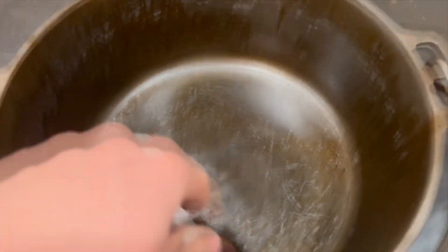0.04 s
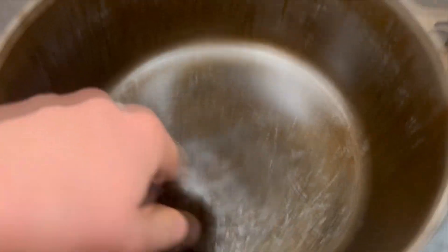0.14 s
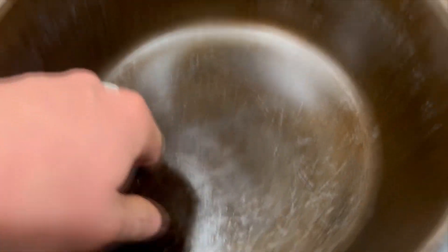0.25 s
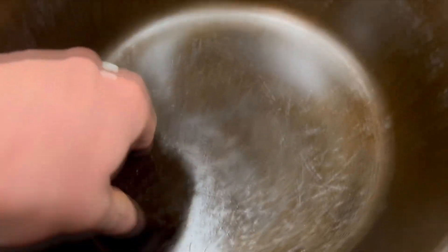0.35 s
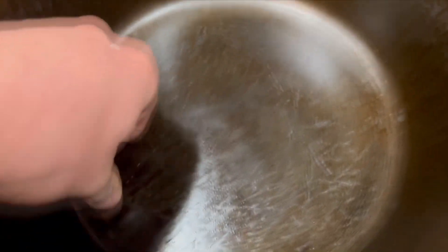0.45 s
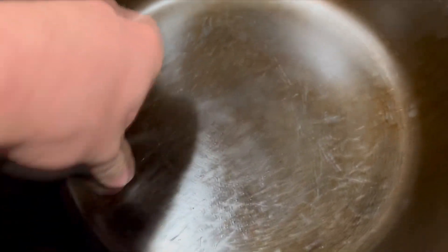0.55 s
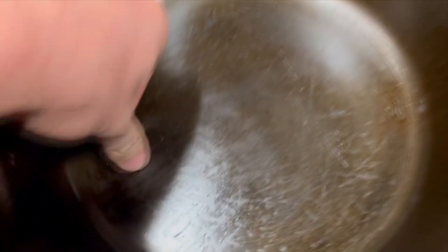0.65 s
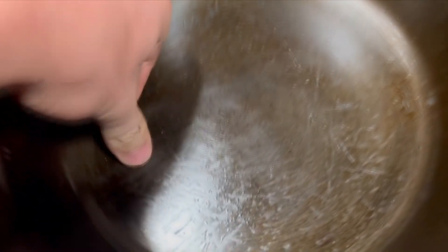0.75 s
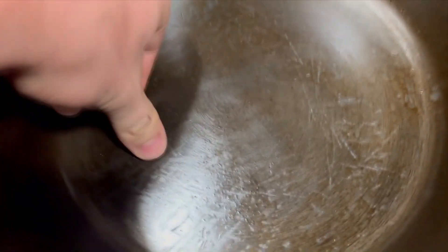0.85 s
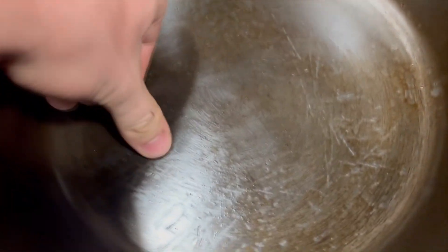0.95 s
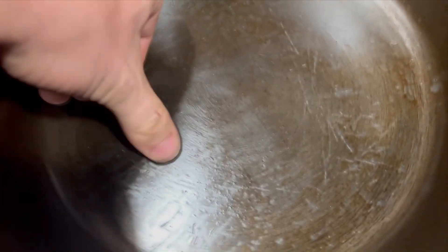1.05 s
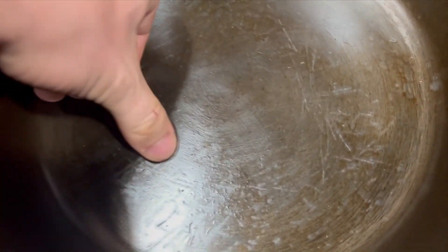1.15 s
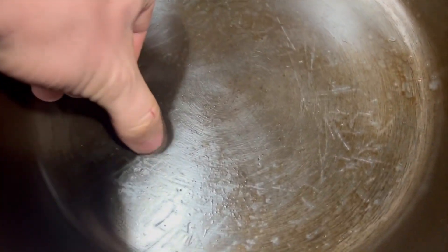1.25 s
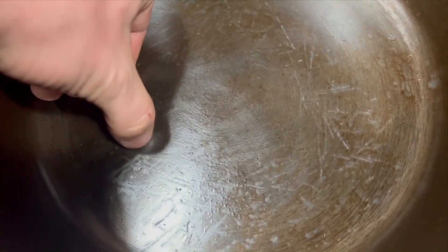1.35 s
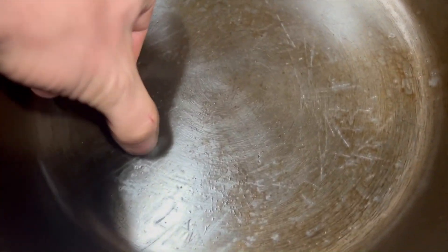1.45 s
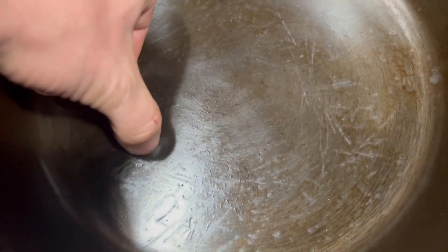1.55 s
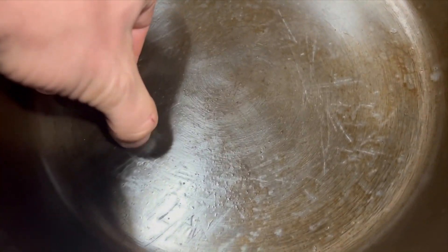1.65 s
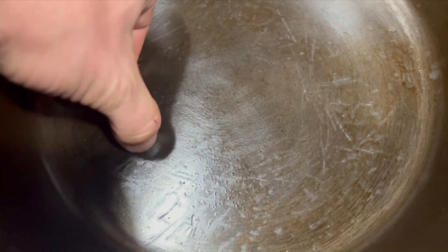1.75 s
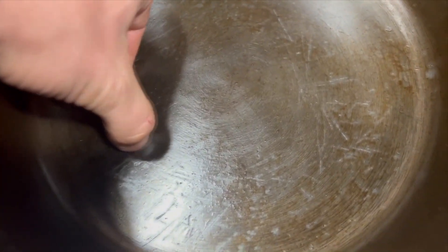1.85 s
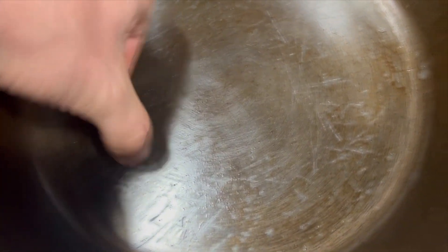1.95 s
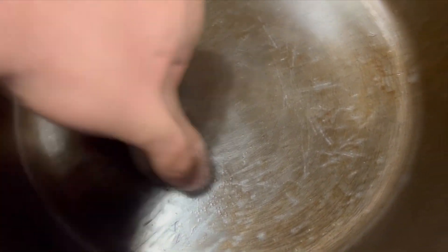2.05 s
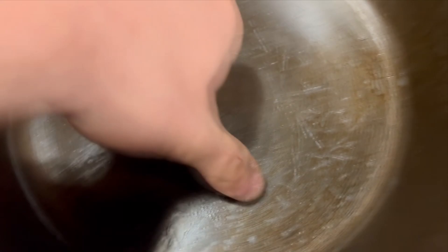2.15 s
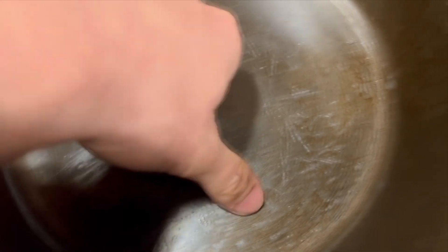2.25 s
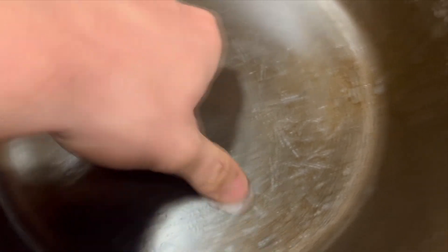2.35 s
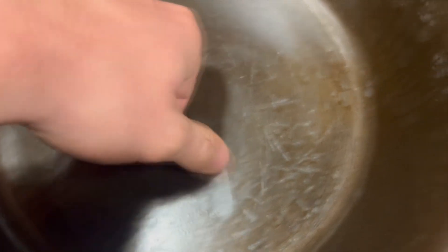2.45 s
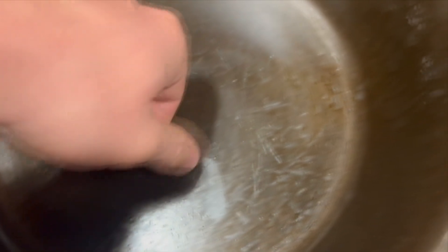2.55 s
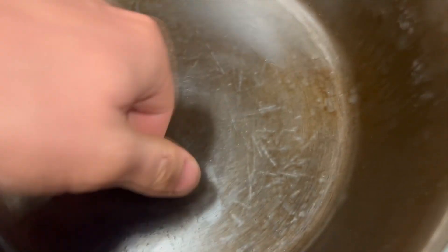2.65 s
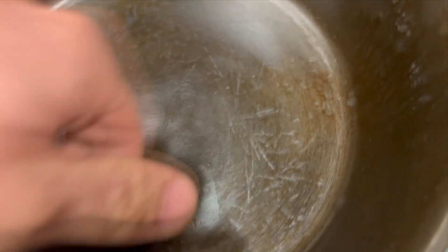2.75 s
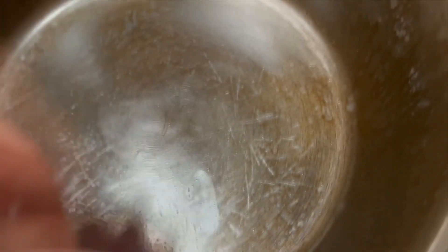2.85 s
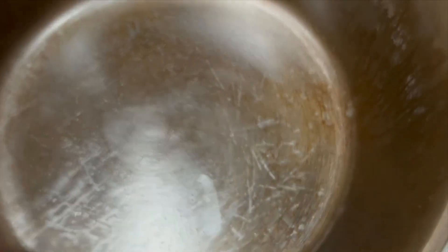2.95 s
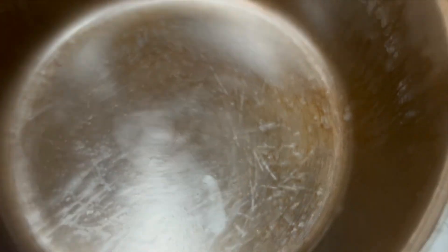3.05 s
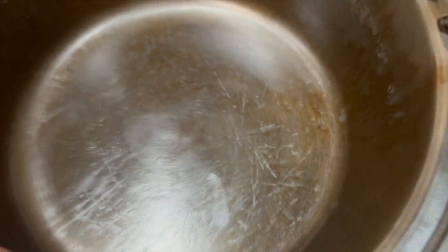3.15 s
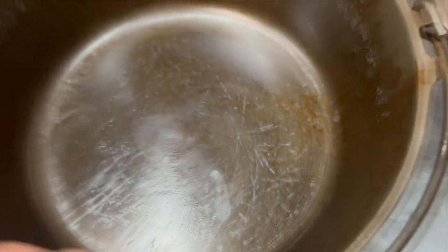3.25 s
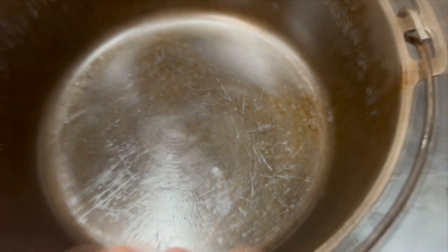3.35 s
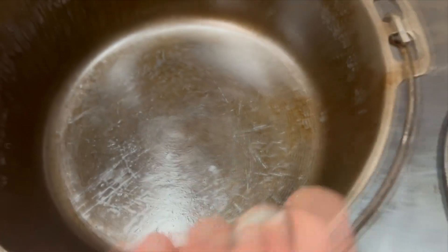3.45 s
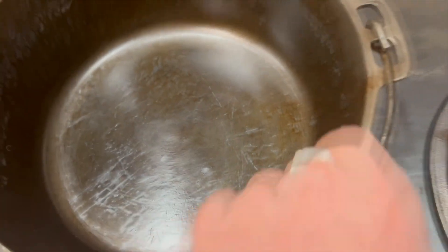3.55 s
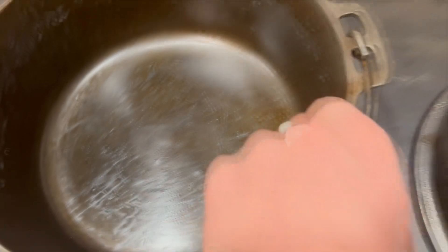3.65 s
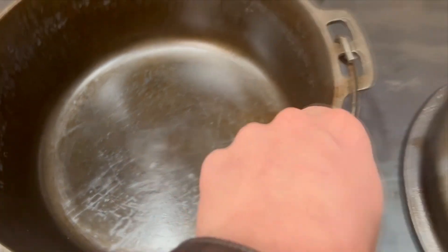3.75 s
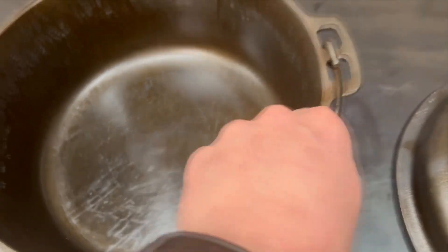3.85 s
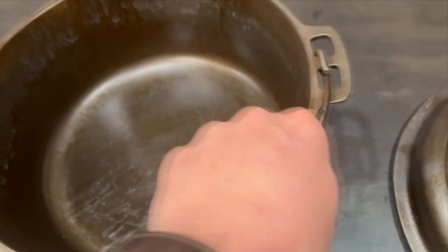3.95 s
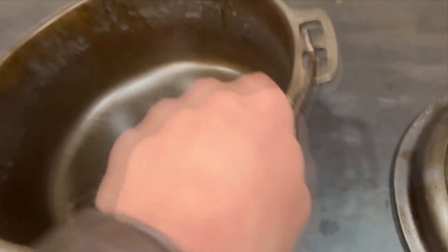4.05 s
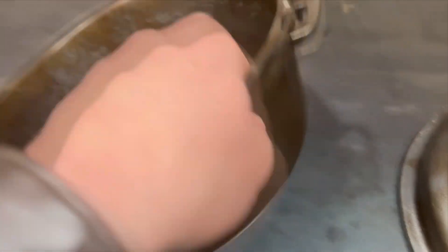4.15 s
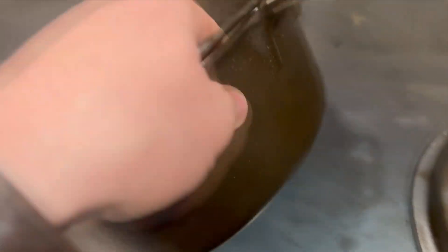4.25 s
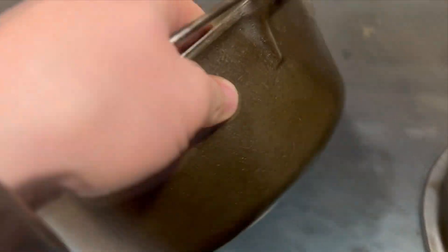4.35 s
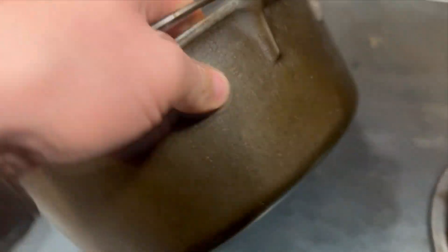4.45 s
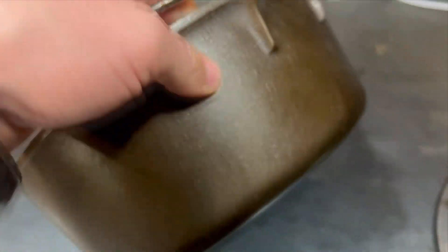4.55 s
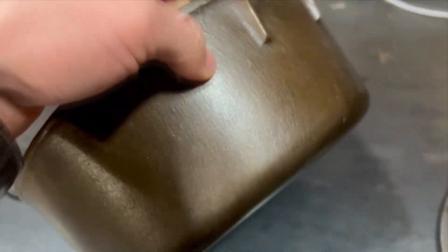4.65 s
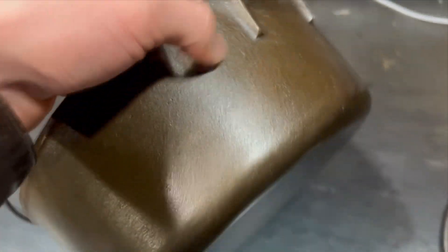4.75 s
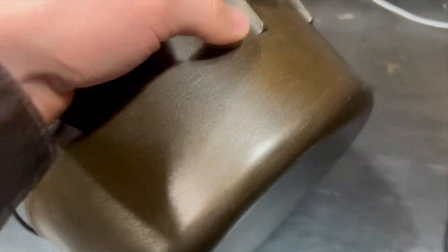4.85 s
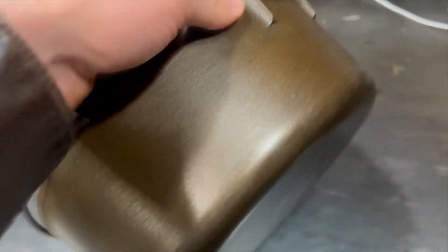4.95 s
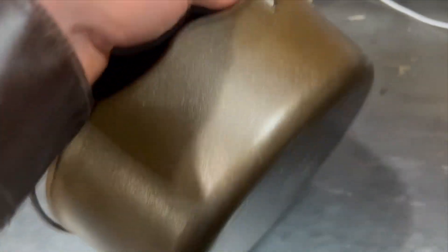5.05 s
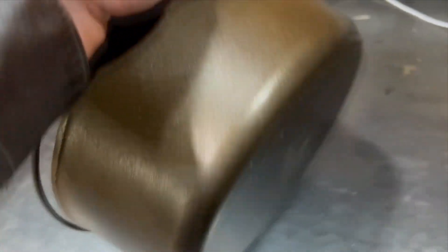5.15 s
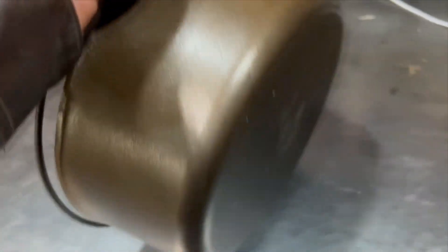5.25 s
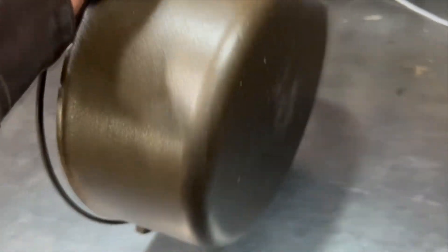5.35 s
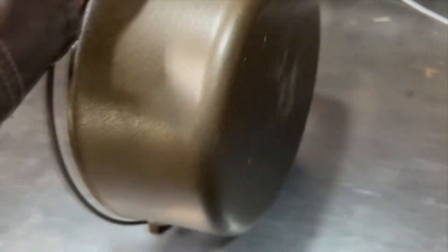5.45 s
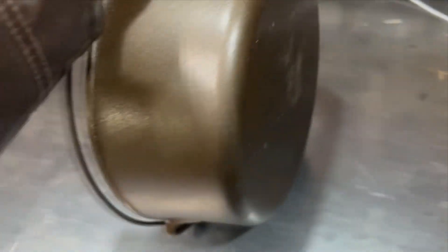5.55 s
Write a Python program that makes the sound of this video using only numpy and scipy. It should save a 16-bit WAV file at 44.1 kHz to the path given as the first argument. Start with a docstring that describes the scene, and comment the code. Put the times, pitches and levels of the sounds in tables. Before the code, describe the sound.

A room with a low, wavering two-note machine hum under a dull rush of air, heard from a close stereo microphone; the hum swells and fades. From about 0.35 to 2.8 seconds a thumb rubs the bottom of a cast iron pot: very faint, dry, hissy strokes and tiny finger ticks, the clearest near 1 second. A soft longer slide follows at 3.3, then a cloth swish at 3.5. Around 3.9 a dull double knock with a low bench thump starts the handling. From 4.0 to 4.8 the wire handle clinks, and the rim grinds over the metal-topped bench, rumbling and gritty, with brief wavering squeaks. At 4.84 comes the loudest event, a bright heavy iron clank with a quick rattle of following blows to 4.95, ringing near 930 hertz with a fast beat. The hand damps it from 5.1; a small clink and faint rubs remain over the hum until about 5.6.

```python
"""A thumb rubs over the bottom of a cast iron pot: stereo grains of slip, coloured by skin and iron.
Fingers tap it (short noise bursts), the hand grips the rim and tips the pot: its edge grinds over a
metal-topped bench (grains driving resonances), contacts squeak (wavering tones), then the iron clanks,
rattles and rings (noise crashes and damped modes). Cloth swishes (shaped noise); the room has a low
machine hum (two wavering tones) under a rush of air (dull noise)."""
import sys
import numpy as np
from scipy import signal
from scipy.fft import rfft, irfft, next_fast_len
from scipy.io import wavfile

SR = 44100
rng = np.random.default_rng(int(sys.argv[2]) if len(sys.argv) > 2 else 0)


def persist_wave(psi):
    """Save psi, clipped to +-1, as 16-bit WAV."""
    counts = np.round(np.clip(psi, -1, 1) * 32767).astype(np.int16)
    wavfile.write(sys.argv[1], SR, np.atleast_2d(counts).T)


N = 246959
TIME = np.arange(N) / SR
GRIP_S = 5.09  # the palm closes on the wall

# pot wall modes, the first two beating about 8 times a second: pitch_hz, level_db, t60_s
POT_MODES = [(932, 1.5, .51), (940.2, -5.8, .78), (668, -12, .4), (1005, -12, .14), (1130, -18, .45),
             (1468, -13, .42), (1613, -8, .15), (1726, -11, .52), (2033, -8, .16), (2159, -2.5, .54),
             (2507, -14, .66), (2690, -11, .45), (2948, -11.5, .38), (3290, -14, .25), (3440, -13, .25),
             (3538, -9, .2), (3670, -14, .36), (3761, -10, .22), (3844, -9, .22), (3941, -9, .28),
             (4094, -5, .18), (4293, -8, .24), (4650, -11, .22), (4862, -9, .24), (4972, -6, .25),
             (5336, -3, .19), (5570, -10, .24), (5766, -4, .18), (5882, -2, .18), (6140, -17, .38),
             (6498, -13, .2), (7090, -13, .24), (7550, -14, .22), (8058, -6, .15), (8376, -11, .14),
             (8909, -12, .13), (9740, -19, .33), (9951, -2, .15), (10230, -9, .12)]
# bench modes under the pot's weight: pitch_hz, level_db, t60_s
BENCH_MODES = [(55.54, -12.5, 0.23), (88, 5, 0.11), (115, -7, .12), (160.4, -6.5, 0.16),
               (254.6, -17.5, 0.068), (270, -10.5, 0.21), (301.6, -17, 0.014), (350, -31.5, 0.092),
               (508, -20, 0.14), (590, -20, 0.12)]
# stereo image of the contacts: freq_hz, left_right_likeness (-1 to 1)
LIKENESS_CURVE = [(80, 0.99), (330, 0.97), (700, 0.6), (1300, 0.4), (4000, 0.39), (7600, 0.34),
                  (8750, 0.86), (10200, -0.95), (15000, 0.46)]
# stereo image of sound that fills the room, clipped to -1..1: freq_hz, left_right_likeness
DIFFUSE_CURVE = [(60, 0.98), (150, 0.88), (380, 0.54), (950, 0.008), (2400, .1), (6000, 0.32), (8750, 0.94),
                 (10200, -1.2), (15000, -0.5)]


def rubbing():
    """Skin slips over the grain of the iron: unsteady hiss, resonances under firm strokes, fine sheen."""
    # thumb strokes: start_s, length_s, relative_level_db, resonance_db and sheen_db re level
    strokes = [(0.357, 0.026, -62, -0.5, -8.5), (0.403, 0.062, -68.5, -19, -11), (0.48, 0.27, -69, -14, -7),
               (0.769, 0.041, -62.5, -3, -10), (0.819, 0.052, -67, -6, -1.5), (0.902, 0.035, -66.5, -5, -9),
               (0.957, 0.015, -63, -5, -7), (1.054, 0.03, -75, -11, -19), (1.638, 0.026, -66, -11, -13),
               (1.745, 0.011, -70.5, -9, -9), (1.875, 0.011, -72, -17, -20), (1.997, 0.041, -69, -10, -14),
               (2.15, 0.022, -66, -14, -9), (2.164, 0.13, -69.5, -7.5, -10), (2.37, 0.15, -70.5, -9, -1),
               (2.627, .02, -73, -17, -20), (2.655, 0.14, -67.5, -8, -7.5),
               (3.268, 0.35, -70.5, -3.5, -2.5), (4.998, 0.1, -68, 3.5, -16), (5.16, 0.089, -76, -3, -12),
               (5.37, 0.076, -72.5, -6, -24)]
    # spectrum of skin on iron: freq_hz, density_db_per_hz
    skin = [(800, 9), (1800, 4), (3000, 1), (4200, 2), (6000, 3), (7500, 3.5), (9000, -4), (10000, -37),
            (10900, -11), (13000, -14), (15500, -8)]
    # fine hiss of a light, fast slide: freq_hz, density_db_per_hz
    sheen_spectrum = [(6500, -41), (8000, -4), (8600, 10.5), (9800, 10), (10400, -8), (11000, -23),
                      (15500, -8)]
    # resonances that colour the rubbing: pitch_hz, width_hz, level_db
    rub_peaks = [(2860, 160, 0), (3790, 140, -3), (4300, 120, -5), (5000, 110, 0), (5760, 130, -3),
                 (6500, 150, -5.5), (7460, 140, -4), (8560, 200, -1), (9330, 200, -6)]
    power = np.zeros((3, N))
    for start_s, length_s, db, ring_db, sheen_db in strokes:
        gains = from_db([[db], [db + ring_db], [db + sheen_db]])
        power += (gains * stroke(start_s, length_s)) ** 2
    hiss, ringing, sheen = np.sqrt(power)
    slips = grains(per_s=6000, spread_db=2.5)
    unsteady = from_db(3.0 + 0.66 * drift(45))
    rub = hiss * colour(slips, skin)
    rub = rub + sheen * colour(slips[::-1], sheen_spectrum)
    rub = rub + ringing * resonate(slips[0], rub_peaks, wander_db=4.5)
    return unsteady * rub


def stroke(start_s, length_s):
    """Pressure of one stroke: a quick rise, a hold, an exponential release."""
    rise_share, rise_max_s, release_t60_s = 0.37, 0.061, 0.13
    rise = np.clip((TIME - start_s) / min(rise_share * length_s, rise_max_s), 0, 1)
    release = np.clip((TIME - start_s - length_s) / release_t60_s, 0, 2)
    return rise * from_db(-60 * release)


def touches():
    """A finger lands on the iron: a narrow damped tick over a short broad tap."""
    # light touches, levels at onset: time_s, tick_db, pitch_hz, tap_db
    landings = [(0.363, -56, 2920, -56), (0.785, -64, 2900, -60), (0.966, -49, 2800, -70),
                (1.0228, -47.5, 2710, -66), (1.292, -66, 2650, -75), (1.512, -68, 1500, -72),
                (1.6377, -58, 2060, -55), (1.754, -71, 2160, -64), (1.8814, -59, 2080, -59),
                (1.9674, -70, 2400, -62), (2.161, -62, 1680, -53), (2.227, -56, 1960, -54.5),
                (2.5174, -64, 3360, -68), (2.62, -64, 2200, -52), (2.64, -58, 2010, -56),
                (3.7735, -55, 2830, -53), (3.84, -59, 2830, -58)]
    tick_t60_s, tap_t60_s, tick_width_hz = .028, .03, 150
    out, t = np.zeros((2, N)), TIME[:SR // 4]
    for time_s, tick_db, hz, tap_db in landings:
        width = min(tick_width_hz, hz / 5)
        tick_spectrum = [(hz / 2, -45), (hz - 2 * width, -22), (hz - width, -7), (hz, 0),
                         (hz + width, -7), (hz + 2 * width, -22), (hz * 2, -45)]
        tap_spectrum = [(hz / 4, -6), (hz / 2, 0), (hz, -2.5), (hz * 4, -32)]
        tick = noise(tick_spectrum, size=len(t)) * fade(t, tick_t60_s)
        tap = noise(tap_spectrum, size=len(t)) * fade(t, tap_t60_s)
        add(out, time_s, from_db(tick_db) * tick + from_db(tap_db) * tap)
    return out


def rolling():
    """The rough rim rides over the bench: bumps shake the top, grit hisses, the wall sings along."""
    # rim on the bench, relative levels: time_s, rumble_db, grit_db, wall_singing_db
    roll = [(3.99, -70.5, -69, -84), (4.19, -38, -50.5, -65), (4.32, -31.5, -48, -58),
            (4.37, -32, -51.5, -56), (4.52, -31, -55, -56), (4.61, -31, -46.5, -53.5),
            (4.68, -28.5, -50.5, -49), (4.75, -32, -46.5, -44), (4.82, -27.5, -42.5, -45.5)]
    # resonances of the rolling contact: pitch_hz, width_hz, level_db
    rumble_peaks = [(241, 38, 0.5), (268, 23, 4.5), (315.5, 41, 0), (340, 45, -7), (408, 44, -6.5),
                    (512, 20, 3), (578, 38, -13), (693, 90, -19.5)]
    # spectrum of the grit: freq_hz, density_db_per_hz
    grit_spectrum = [(400, -6.5), (750, 4.5), (1050, 8), (1300, -12.5), (1700, 0), (2050, -10.5),
                     (3000, -9.5), (4000, -13.5), (5000, -13), (6500, -16), (8200, -15.5), (10000, -19),
                     (10900, -48), (11700, -29), (15500, -44.5)]
    rumble_db, bench_shake_db, side_db = -0.86, -9.5, 1
    rumble, grit, singing = levels(roll)

    bumps = grains(per_s=1200, spread_db=1.5)[0]
    contact = from_db(rumble_db) * resonate(bumps, rumble_peaks, wander_db=1.0)
    shake = from_db(bench_shake_db) * rms_one(highpass(body(bumps, BENCH_MODES), 47))
    low = rumble * (contact + shake)

    slips = rms_one(grains(per_s=3600, spread_db=2.1) * from_db(1.3 * drift(70)))
    scrape = from_db(3.5) * colour(slips, grit_spectrum)
    scrape = scrape + from_db(1.5) * passing_modes(slips[0])
    scrape = grit * (scrape + from_db(1.0) * crowd(slips[1]))

    drive = lowpass(lowpass(slips[1], 2000), 2000)
    wall = body(drive * singing, POT_MODES) / np.std(body(drive, POT_MODES))
    balance = from_db([[-.9], [.9]])
    return scale_side(low + (scrape + gripped(wall)) * balance, side_db)


def passing_modes(slips):
    """As the contact travels round the rim, one mode of the wall after another swells and fades."""
    # wall resonances under the grit: pitch_hz, width_hz, level_db, strongest_s
    wall = [(1097, 50, -2, 4.26), (1557, 83, -2.5, 4.36), (2235, 50, -3.5, 4.35), (2411, 40, -6.5, 4.41),
            (2583, 40, -15, 4.2), (2720, 41, -6, 4.36), (4242, 35, -9.5, 6), (4380, 35, -20, 3.6),
            (4700, 30, -11, 4.6), (5340, 30, -17, 4.2), (5469, 30, -12, 4.29), (6000, 30, -13, 4.4),
            (6072, 30, -8, 3.8), (6780, 60, -7, 3.2), (7127, 30, -11, 4.17), (8268, 30, -11, 4.23),
            (9000, 35, -14, 4.34), (1495, 35, -1, 4.65), (1726, 41, -2.5, 4.73), (2530, 40, -10.5, 4.76),
            (2930, 45, -6, 4.7), (3682, 27, -8, 4.79), (4700, 40, -12.5, 4.58), (4888, 30, -13, 4.76),
            (4974, 25, -14, 4.79), (5470, 30, -8, 4.67), (5878, 30, -15.5, 4.6), (6244, 30, -14, 4.57),
            (7130, 35, -14, 4.74), (7450, 30, -17.5, 4.54), (8010, 25, -14.5, 4.62), (8100, 25, -12, 4.79),
            (8699, 48, -10.5, 4.77), (9500, 30, -14.5, 4.75)]
    pass_s = 0.12  # half width of the swell, at 1/e
    out = 0
    for hz, width_hz, db, peak_s in wall:
        swell = np.exp(-((TIME - peak_s) / pass_s) ** 2)
        out = out + from_db(db) * swell * rms_one(body(slips, [(hz, 0, width_to_t60(width_hz))]))
    return out


def crowd(slips, count=64, low_hz=1200, high_hz=9800, tilt_db_per_octave=-5.5):
    """The many weaker modes of the wall, each wandering in strength under the grit."""
    pitches = np.linspace(low_hz, high_hz, count) + rng.uniform(-60, 60, count)
    t60_s, wander_db = .08, 3.5
    out = 0
    for hz in pitches:
        mode = (hz, tilt_db_per_octave * np.log2(hz / low_hz), t60_s)
        out = out + from_db(wander_db * drift(12)) * body(slips, [mode])
    return rms_one(out)


def squeaks():
    """Stick and slip keep one mode going for a moment, unsteady in pitch and rough in level."""
    # bail or wall singing briefly: middle_s, half_length_s (at 1/e), pitch_hz, level_db
    catches = [(4.205, 0.055, 2492, -48), (4.328, 0.07, 3194, -53), (4.41, 0.11, 1724, -49.5),
               (4.785, 0.07, 942, -39), (4.8, 0.11, 2176, -50)]
    waver_hz, roughness, level_points_per_s = 13, .45, 170
    out = 0
    for middle_s, half_s, hz, db in catches:
        rough = 1 + roughness * drift(level_points_per_s)
        swell = np.exp(-((TIME - middle_s) / half_s) ** 2)
        out = out + from_db(db) * rough * swell * tone(hz, waver_hz, turns_per_s=30)
    return out


def blows():
    """Each knock crashes and sets pot, bail and bench ringing; the bail also clinks by itself."""
    # iron on bench, relative levels: time_s, crash_db, brightness_hz, pot_db, bench_thump_db, bench_top_db
    knocks = [(3.881, -40, 12900, -73, -31.5, -57), (3.884, -50, 450, -71, -45, -44),
              (3.894, -69, 870, -81, -20, -43), (3.923, -38, 15400, -80, -62, -52),
              (3.958, -67, 1240, -78, -30.5, -56), (4.8379, -13.5, 10400, -23, -28.5, -25.5),
              (4.8408, -15.5, 6940, -57.5, -26, -14.5), (4.856, -20.5, 14100, -43.5, -14.5, -28.5),
              (4.87, -31, 4000, -53, -45.5, -36.5), (4.9096, -17, 1100, -76.5, -24.5, -20.5),
              (4.949, -42.5, 1510, -58, -21, -38)]
    # wire bail against the pot, relative levels: time_s, click_db, ring_db, brightness_hz
    clinks = [(4.0146, -44, -37, 3000), (4.0704, -50, -43, 4030), (4.085, -40, -37, 3000),
              (4.1497, -45.5, -47, 5000), (4.1765, -45.5, -56, 5920), (4.194, -35.5, -30.5, 9130),
              (4.2697, -44, -39, 4030), (4.319, -42.5, -45, 4000), (4.6, -43.5, -45, 9040),
              (4.739, -45.5, -46, 9100), (5.07, -52, -47, 4030)]
    # wire bail modes: pitch_hz, level_db, t60_s
    bail_modes = [(1776, -20.5, 0.23), (2670, -18.5, 0.27), (2990, -8, 0.089), (3180, -8, 0.065),
                  (3870, -7, 0.063), (4280, -5, 0.11), (5570, -14.5, 0.12), (6140, -9, 0.13),
                  (6751, -8, .08), (8100, -12, .1), (8460, -8, 0.079)]
    # bench top modes: pitch_hz, level_db, t60_s
    top_modes = [(244.5, -15.5, 0.36), (279.7, -2.5, 0.15), (342, -10.5, 0.088), (382.4, -14, 0.2)]
    bail_shake_db = -27.5  # re crash_db
    out, push = np.zeros((2, N)), np.zeros(N)
    response = crash(low_t60=0.077, high_t60=0.12, split_hz=1100, tail_db=-18.5, tail_t60=0.64,
                     crack_db=-5, crack_t60=0.01)
    for time_s, crash_db, bright_hz, _, bench_db, _ in knocks:
        add(out, time_s, from_db(crash_db) * lowpass(response, bright_hz))
        # the heavy bench follows only the slow part of a contact
        push += lowpass(clicks([time_s], [bench_db]) + 1e-18, bright_hz / 10)
    times_s, crash_db, _, pot_db, _, top_db = np.transpose(knocks)
    shake = clicks(times_s, crash_db + bail_shake_db)
    for time_s, click_db, ring_db, bright_hz in clinks:
        add(out, time_s, from_db(click_db) * lowpass(highpass(response, 1400), bright_hz))
        shake += lowpass(clicks([time_s], [ring_db]) + 1e-18, bright_hz)
    iron = gripped(body(clicks(times_s, pot_db), POT_MODES) + body(shake, bail_modes))
    bench = highpass(body(push, BENCH_MODES) + body(clicks(times_s, top_db), top_modes), 66)
    return (out + iron) * from_db([[-1.0], [.8]]) + bench


def crash(low_t60, high_t60, split_hz, tail_db, tail_t60, crack_db, crack_t60):
    """The crowd of close modes after a blow: a crack, bass and treble fading apart, a faint room tail."""
    # spectrum of the crash: freq_hz, density_db_per_hz
    crash_spectrum = [(100, -22.5), (190, -6), (255, 10.5), (450, 5.5), (700, 0), (1300, -3.5), (2000, -2),
                      (3000, -8.5), (4200, -.5), (5800, -3), (7200, -5), (9000, -3), (10100, -1.5),
                      (10900, -26), (15500, -17)]
    t = TIME[:SR * 3 // 4]
    dense = noise(crash_spectrum, size=len(t)) * (1 + from_db(crack_db) * fade(t, crack_t60))
    low = lowpass(dense, split_hz)
    tail = lowpass(noise(crash_spectrum, size=len(t)), 3000) * fade(t, tail_t60)
    return low * fade(t, low_t60) + (dense - low) * fade(t, high_t60) + from_db(tail_db) * tail


def gripped(iron, db_per_s=90):
    """The hand damps the ringing iron."""
    return iron * from_db(-db_per_s * np.maximum(TIME - GRIP_S, 0))


def sleeve():
    """Cloth makes a smooth, broad swish as the hand reaches for the rim, and a faint rustle."""
    # rustle while the hand moves: time_s, level_db
    rustle = [(.3, -77), (1.0, -69), (1.5, -122), (2.1, -74), (2.4, -81), (3.05, -70.5), (3.9, -72)]
    # swishes of the reach: start_s, length_s, level_db
    swishes = [(3.235, 0.3, -66.5), (3.533, 0.15, -51.5), (3.648, 0.1, -58), (3.7, 0.11, -59),
               (3.81, 0.37, -59)]
    # spectrum of cloth: freq_hz, density_db_per_hz
    cloth = [(900, 3.5), (2000, -1), (2700, -1.5), (3400, 3), (4400, 1.5), (6500, -1), (8000, -2.5),
             (9100, -0.5), (10300, -3), (11000, -13.5), (13000, -17), (15500, -2)]
    power = levels(rustle)[0] ** 2
    for start_s, length_s, db in swishes:
        power = power + (from_db(db) * stroke(start_s, length_s)) ** 2
    return np.sqrt(power) * from_db(2.0 * drift(31)) * noise(cloth, DIFFUSE_CURVE)


def room():
    """Two wavering machine tones over a dull rush of air."""
    # hum, swelling and fading with position in the room: time_s, lower_db, upper_db
    hum_levels = [(0, -55.5, -39), (1.15, -45.5, -49), (1.45, -57, -55.5), (2.25, -73, -50),
                  (3.75, -65, -56.5), (4.15, -40.5, -48.5), (4.95, -39.5, -59), (5.3, -37, -77),
                  (5.6, -37.5, -57)]
    # rush of air: time_s, level_db re air_base_db
    rush = [(0, 4), (1.4, 0.5), (3.6, 0.5), (5.6, 0)]
    # spectrum of air: freq_hz, density_db_per_hz
    air = [(22, -42), (40, -12.5), (74, -2.5), (95, -4.5), (132, -2.5), (170, -12.5), (290, -21),
           (430, -26), (800, -23), (1200, -30), (2000, -40), (3200, -53), (9500, -60.5), (15000, -74.5)]
    air_base_db = -47.5
    lower, upper = levels(hum_levels)
    hum = lower * tone(91.1, waver_hz=0.18) + upper * tone(127.3, waver_hz=1.07)
    rushing = from_db(air_base_db) * levels(rush)[0] * noise(air, DIFFUSE_CURVE)
    return hum * from_db([[-.8], [.6]]) + rushing


def ring(force, hz, t60, turn=0):
    """A unit click rings a sine of height 1, whose phase differs by turn between the channels."""
    pole = from_db(-60 / (t60 * SR)) * np.exp(2j * np.pi * hz / SR)
    wave = signal.lfilter([1], [1, -pole], force + 1e-18)
    return np.imag(wave * np.exp(.5j * turn * np.array([[1], [-1]])))


def body(force, modes):
    """All modes of an object; each reaches the two channels with its own phase difference."""
    out = 0
    for k, (hz, db, t60) in enumerate(modes):
        turn = np.arccos(np.clip(at_hz(LIKENESS_CURVE, hz), -1, 1)) * rng.choice([-1, 1])
        out = out + (-1) ** (k // 2) * from_db(db) * ring(force, hz, t60, turn)
    return out


def resonate(force, peaks, wander_db):
    """Steady drive through resonances; each swells and fades as the moving contact crosses its nodes."""
    out = 0
    for hz, width_hz, db in peaks:
        mode = (hz, db + 20 * np.log10(width_hz), width_to_t60(width_hz))
        out = out + rng.choice([-1, 1]) * body(force * from_db(wander_db * drift(13)), [mode])
    return rms_one(highpass(out, .85 * peaks[0][0]))


def width_to_t60(width_hz):
    """Decay time in seconds of a resonance of this width."""
    return np.log(1000) / np.pi / width_hz


def tone(hz, waver_hz, turns_per_s=4):
    """A tone that wavers a little in pitch and level; rms about 1."""
    phase = 2 * np.pi * np.cumsum(hz + waver_hz * drift(turns_per_s)) / SR
    return from_db(0.38 * drift(3.2)) * np.sqrt(2) * np.sin(phase)


def grains(per_s, spread_db):
    """Tiny slips of uneven size, at the same moments in both channels."""
    sizes = from_db(spread_db * np.minimum(rng.exponential(1, N), 4))
    sizes = sizes * (rng.random(N) < per_s / SR)
    return rms_one(sizes * rng.standard_normal((2, N)))


def clicks(times_s, db):
    """One impulse for each contact."""
    return np.bincount(np.round(np.asarray(times_s) * SR).astype(int), from_db(db), N)


def colour(pair, spectrum, likeness=LIKENESS_CURVE):
    """Two unrelated signals become one stereo sound with this spectrum; rms 1."""
    size = next_fast_len(pair.shape[1])
    hz = np.arange(size // 2 + 1) * SR / size
    mid, side = rfft(pair, size) * from_db(at_hz(spectrum, hz))
    alike = np.clip(at_hz(likeness, hz), -1, 1)
    both = np.sqrt(1 + alike) * mid + np.sqrt(1 - alike) * side * [[1], [-1]]
    return rms_one(irfft(both, size)[:, :pair.shape[1]])


def noise(spectrum, likeness=LIKENESS_CURVE, size=N):
    """Smooth stereo noise."""
    return colour(rng.standard_normal((2, size)), spectrum, likeness)


def drift(rate):
    """Slow chance of unit rms, with rate random points per second."""
    knots = rng.standard_normal(int(N / SR * rate) + 2)
    return rms_one(np.interp(TIME * rate, np.arange(len(knots)), knots))


def levels(rows):
    """Gain curves of a table of dB columns, fading quickly to silence outside it."""
    s, *columns = np.transpose(rows)
    inside = np.interp(TIME, [s[0] - .04, s[0], s[-1], s[-1] + .04], [0, 1, 1, 0])
    return [from_db(np.interp(TIME, s, c)) * inside for c in columns]


def at_hz(points, hz):
    """Read a table on a log-frequency axis."""
    f, value = np.transpose(points)
    return np.interp(np.log(hz + 1), np.log(f), value)


def fade(t, t60):
    """Exponential decay by 60 dB in t60 seconds."""
    return 1000 ** (-t / t60)


def from_db(db):
    """Decibels to gain."""
    return 10 ** (np.asarray(db) / 20)


def rms_one(x):
    """Scale to unit rms."""
    return x / np.sqrt(np.mean(x ** 2) + 1e-20)


def lowpass(x, hz):
    """Gentle treble loss."""
    return signal.sosfilt(signal.butter(1, min(hz, .45 * SR), fs=SR, output="sos"), x)


def highpass(x, hz):
    """Steep bass cut."""
    return signal.sosfilt(signal.butter(4, hz, "high", fs=SR, output="sos"), x)


def scale_side(x, side_db):
    """Scale the difference between the channels; positive side_db widens the image."""
    mid = x.mean(axis=0)
    return mid + from_db(side_db) * (x - mid)


def add(out, time_s, sound):
    """Mix a sound in at a time."""
    at = round(time_s * SR)
    out[:, at:at + sound.shape[1]] += sound[:, :N - at]


def scene():
    """Hand, pot and room together."""
    return rubbing() + touches() + rolling() + squeaks() + blows() + sleeve() + room()


def record(dry):
    """Treble above a dip near 10.4 to 11 kHz is weaker; a steep lowpass cuts the very top."""
    cutoff_hz = 15800
    main = signal.sosfilt(signal.ellip(8, .3, 60, 10400, fs=SR, output="sos"), dry)
    top = signal.sosfilt(signal.butter(6, 11000, "high", fs=SR, output="sos"), dry)
    steep = signal.ellip(10, .2, 80, cutoff_hz, fs=SR, output="sos")
    return signal.sosfilt(steep, main + from_db(-4) * top)


dry = scene()
out = record(dry)
persist_wave(out)
```